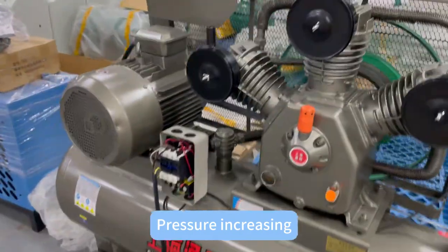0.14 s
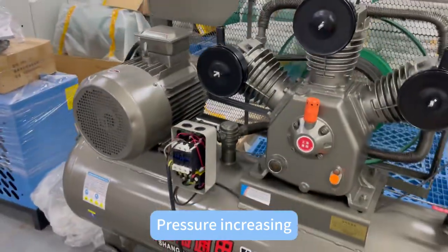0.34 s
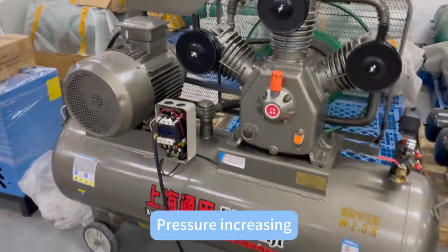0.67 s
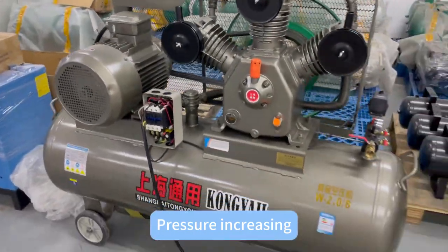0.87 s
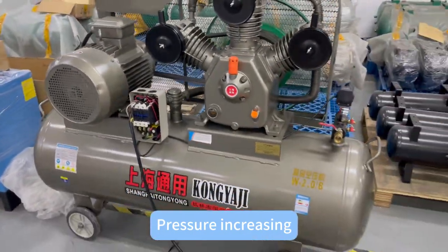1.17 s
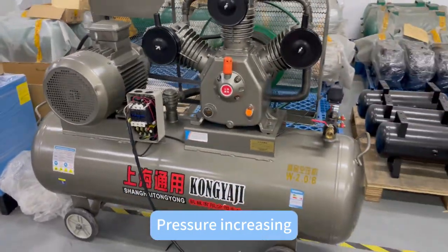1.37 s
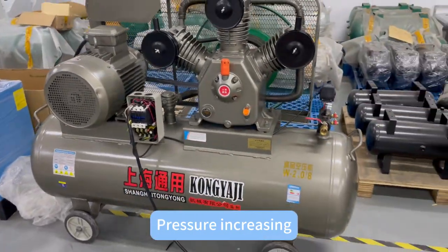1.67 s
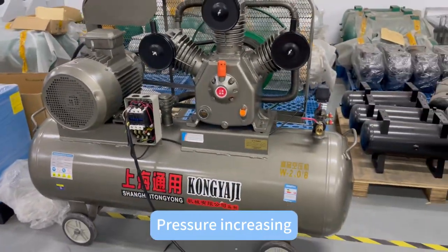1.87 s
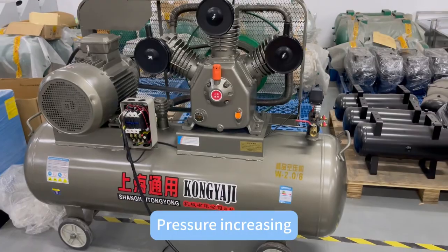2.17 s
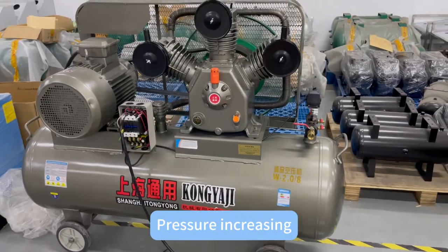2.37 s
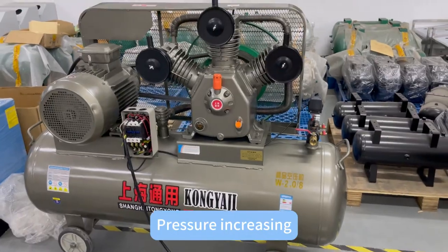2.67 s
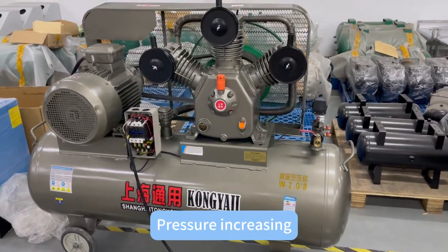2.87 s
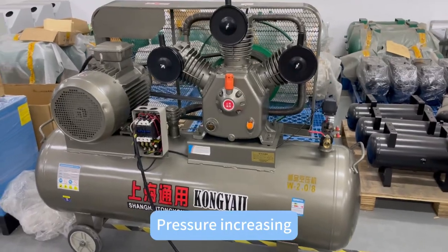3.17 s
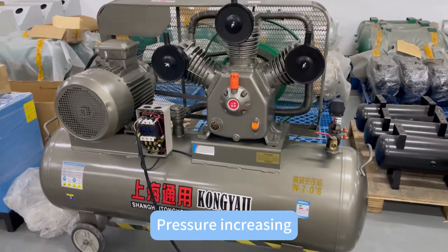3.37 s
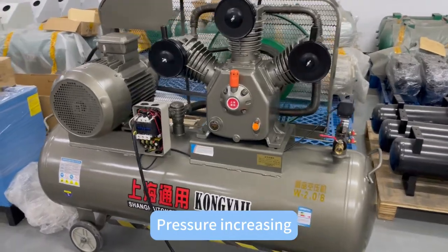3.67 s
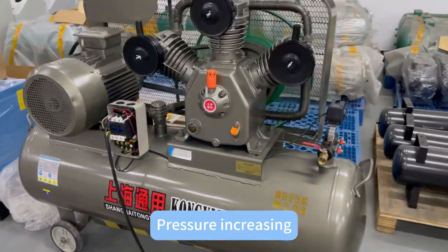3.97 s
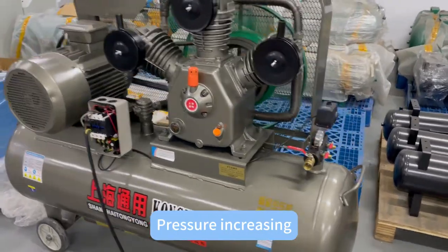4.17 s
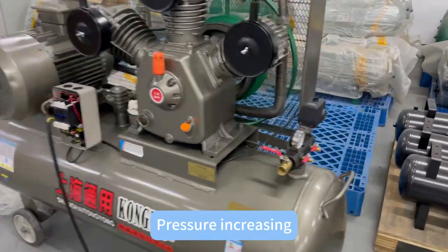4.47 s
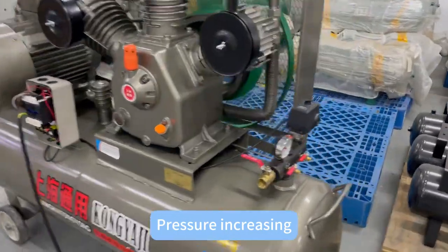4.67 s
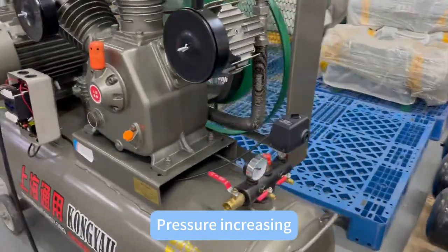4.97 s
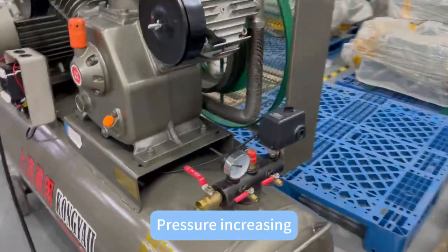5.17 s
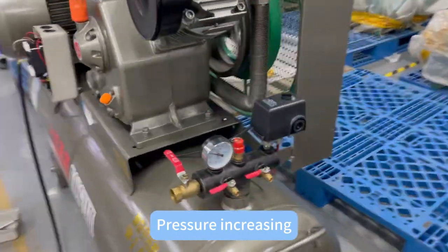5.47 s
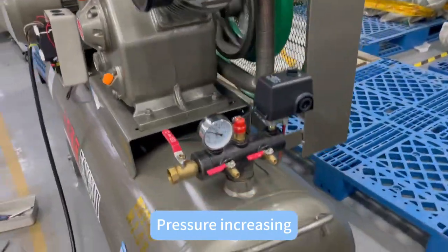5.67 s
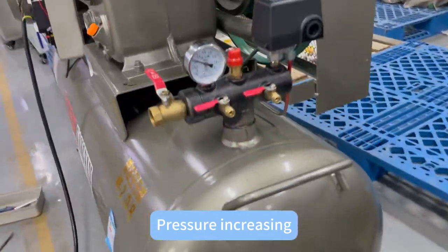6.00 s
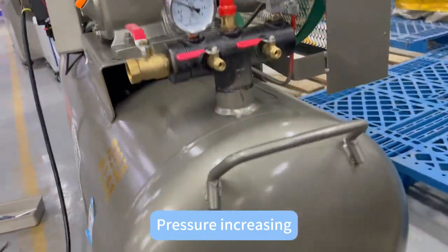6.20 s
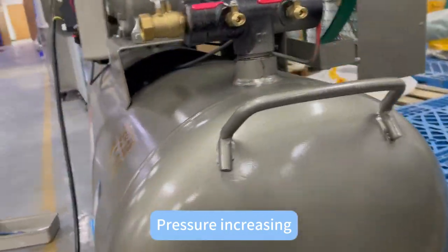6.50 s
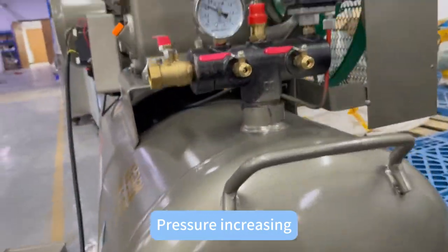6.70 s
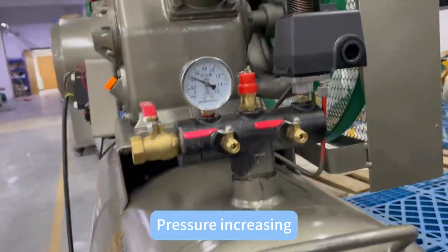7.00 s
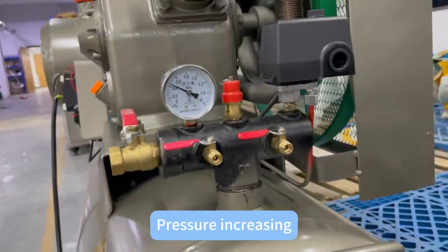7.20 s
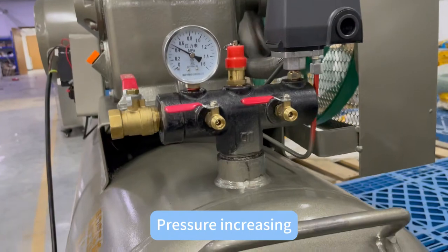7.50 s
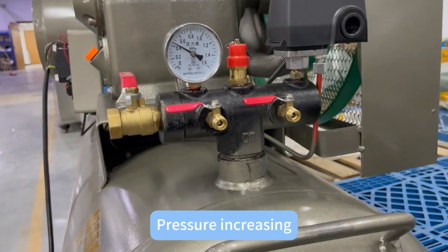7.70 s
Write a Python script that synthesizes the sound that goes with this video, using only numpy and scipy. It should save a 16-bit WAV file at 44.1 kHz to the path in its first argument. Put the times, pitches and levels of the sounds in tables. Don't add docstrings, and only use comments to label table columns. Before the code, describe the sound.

Rapid throbbing drone of a three-cylinder air compressor, airy and clattery, growing closer and hissier as a handheld microphone moves towards it.

```python
import sys
import numpy as np
from scipy import signal
from scipy.fft import rfft, irfft, next_fast_len
from scipy.io import wavfile
from scipy.ndimage import uniform_filter1d, map_coordinates

SR = 44100
rng = np.random.default_rng(int(sys.argv[2]) if len(sys.argv) > 2 else 0)


def pcm_store(signal):
    levels = np.round(np.clip(np.atleast_2d(signal), -1, 1) * 32767)
    wavfile.write(sys.argv[1], SR, levels.astype(np.int16).T)


def natural_amplitude(level_db):
    exponent = np.asarray(level_db, float) / 20
    return 10 ** exponent


N = 346185
CRANK_HZ = 12.847


def rms_one(x):
    return x / np.sqrt(np.mean(x ** 2) + 1e-20)


def in_time(rows, s):
    t, *columns = np.transpose(rows)
    return [np.interp(s, t, column) for column in columns]


def plateaus(rows, s, rest_db, edge_db_per_s):
    spans = []
    for start, end, db in rows:
        outside_s = np.maximum(0, np.maximum(start - s, s - end))
        spans.append(db - edge_db_per_s * outside_s)
    return np.maximum(rest_db, np.max(spans, axis=0))


def drift(rate, count):
    r = np.exp(-80 * np.pi * rate / SR)
    noise = rng.standard_normal((count, N // 40 + 2002))
    slow = signal.lfilter([1], [1, -2 * r, r * r], noise)[:, 2000:]
    return np.repeat(slow / slow.std(axis=1, keepdims=True), 40, axis=1)[:, :N]


def bandpass(order, low_hz, high_hz, x):
    return signal.sosfilt(signal.butter(order, [low_hz, high_hz], "band", fs=SR, output="sos"), x)


# multiple [of crank_hz], front_db, afar_db, tank_end_db, gauge_db
ORDERS = [(1, -42, -42, -42, -42), (2, -40, -42, -37, -36), (3, -22, -25, -16, -10),
          (4, -37, -42, -24, -22), (5, -18, -18, -17, -16), (6, -15, -9, -5, -2), (7, -34, -15, -6, -1),
          (8, -10, -11, -20, -27), (9, -7, -8, -4, -5), (10, -13, -12, -14, -11), (11, -5, 0, -1, 0),
          (12, 0, -6, 0, 0), (13, -11, -7, -5, 0), (14, -12, -9, -6, -3), (15, -6, -7, -7, -7),
          (16, -15, -16, -4, -4), (17, -10, -6, -32, -17), (18, -16, -12, -8, -8), (19, -13, -3, -23, -6),
          (20, -11, -9, -7, -7), (21, -7, -8, -1, -1), (22, -10, -10, -8, -5), (23, -25, -18, -8, -3),
          (24, -4, -4, -7, -2), (25, -16, -17, -13, -2), (26, -10, -7, -13, -9), (27, -8, -7, -11, -9),
          (28, -21, -24, -20, -9), (29, -13, -16, -6, -9), (30, -13, -13, -19, -13),
          (31, -22, -13, -18, -11), (32, -33, -18, -20, -14)]
UPPER_ORDERS = [(33, -17, -19, -21, -17), (34, -18, -18, -15, -14), (35, -26, -16, -11, -12),
                (36, -36, -14, -21, -13), (37, -35, -30, -32, -29), (38, -10, -24, -21, -14),
                (39, -27, -26, -29, -32), (40, -30, -24, -29, -30), (41, -26, -21, -24, -21),
                (42, -38, -23, -42, -30), (43, -42, -28, -26, -22), (44, -31, -27, -29, -42),
                (45, -36, -42, -32, -17), (46, -24, -35, -31, -19), (47, -36, -32, -29, -19),
                (48, -35, -34, -31, -23), (49, -41, -23, -25, -12), (50, -26, -24, -32, -22),
                (51, -21, -30, -27, -20), (52, -31, -28, -28, -18), (53, -22, -32, -21, -23),
                (54, -28, -28, -24, -25), (55, -32, -28, -42, -25), (56, -27, -42, -26, -19),
                (57, -25, -24, -24, -17), (58, -23, -32, -42, -17), (59, -42, -29, -42, -19),
                (60, -25, -23, -23, -26), (61, -30, -35, -26, -34), (62, -31, -35, -27, -42),
                (63, -27, -42, -24, -35), (64, -42, -31, -31, -18)]
UPPER_LIFT_DB = 0.5


def order_tables():
    k, *levels = np.transpose(ORDERS + UPPER_ORDERS)
    return [np.c_[k, level + UPPER_LIFT_DB * (k > len(ORDERS))] for level in levels]


def turn_spectrum(orders, booms, lull, boom_width_hz=55):
    k, level_db = np.transpose(orders)
    height = natural_amplitude(level_db) / np.sqrt(np.sum(natural_amplitude(level_db) ** 2))
    timing = 0
    for angle, hz, db in booms:
        nearness = -.5 * ((k * CRANK_HZ - hz) / boom_width_hz) ** 2
        timing = timing + natural_amplitude(db) * np.exp(nearness - 2j * np.pi * (k * angle + hz / 400))
    lull_angle, depth = lull
    quiet = np.clip(1.5 * np.cos(np.pi * (np.arange(256) / 256 - lull_angle)) ** 8, 0, 1)
    breathing = 1 - depth * quiet
    for _ in range(5):
        cycle = irfft(np.r_[0, height * timing / abs(timing)], 256)
        cycle = np.clip(cycle, -1.7 * cycle.std(), 2.4 * cycle.std())
        timing = rfft(cycle * breathing)[1:len(k) + 1]
    return height * timing / abs(timing)


# crank_angle [turns], pitch_hz, level_db
FRONT_BOOMS = [(0.25, 860, -13), (0.27, 200, -7), (0.37, 530, -16), (0.41, 226, -3), (0.43, 357, -7),
               (0.5, 410, -13), (0.63, 165, 0), (0.65, 299, -4), (0.75, 231, -1), (0.77, 390, -6),
               (0.81, 130, -8), (0.92, 140, -2), (0.97, 309, -3)]
# crank_angle [turns], pitch_hz, level_db
FAR_BOOMS = [(0.14, 740, -11), (0.21, 240, -7), (0.35, 124, -10), (0.41, 458, -9), (0.49, 97, -2),
             (0.54, 160, -10), (0.61, 298, 1), (0.67, 530, -8), (0.7, 162, -3), (0.74, 450, -8),
             (0.93, 120, 2), (0.93, 231, -6), (0.99, 281, 2)]
# crank_angle [turns], pitch_hz, level_db
CLOSE_BOOMS = [(0.04, 310, -4), (0.11, 220, -7), (0.35, 270, -16), (0.4, 360, -14), (0.41, 140, -7),
               (0.43, 340, -16), (0.44, 720, 2), (0.46, 210, -6), (0.53, 670, -2), (0.59, 50, -11),
               (0.59, 290, -2), (0.75, 340, -8), (0.77, 140, 0), (0.82, 490, -16), (0.85, 120, -2),
               (0.89, 80, -5), (0.96, 260, -8)]
# crank_angle [turns], pitch_hz, level_db
GAUGE_BOOMS = [(0.02, 400, -16), (0.16, 220, -9), (0.31, 530, -16), (0.34, 710, 0), (0.43, 250, -2),
               (0.43, 330, -6), (0.56, 70, -15), (0.57, 660, 1), (0.58, 320, -1), (0.59, 80, 2),
               (0.67, 120, -12), (0.75, 300, -4), (0.78, 130, -2), (0.88, 330, -16), (0.91, 360, -16),
               (0.92, 380, -15), (0.96, 230, -4)]
LULL = [
    (.14, .1),
    (.8, .05),
    (.27, .15),
    (.27, .15),
]
# time_s, place [0 front, 1 afar, 2 tank end, 3 gauge], walking_blur [0-1]
PLACE = [(0, 0, .03), (.5, .05, .05), (.85, .5, .2), (1.2, .9, .1), (1.5, 1, 0), (3.5, 1, 0),
         (4.0, 1.1, .4), (4.35, 1.4, .55), (4.75, 1.9, .2), (5.2, 2, .03), (5.8, 2.1, 0), (6.4, 3, 0),
         (7.85, 3, 0)]
WALK_EVENS = 0.83


def thumps(turn):
    whole, size = turn.astype(int), 1024
    turn_s = np.arange(whole[-1] + 2) / CRANK_HZ
    place, blur = np.array(in_time(PLACE, turn_s))[:, :, None]
    orders = 0
    booms = (FRONT_BOOMS, FAR_BOOMS, CLOSE_BOOMS, GAUGE_BOOMS)
    for k, heard in enumerate(zip(order_tables(), booms, LULL)):
        share = np.sqrt(np.clip(1 - abs(place - k), 0, 1))
        orders = orders + share * turn_spectrum(*heard)
    chance = rng.standard_normal(orders.shape + (2,)) @ [1, 1j]
    slow_chance = signal.lfilter([.4], [1, -.85], chance, axis=0)
    wander = slow_chance * (.08 + blur) + .6 * blur * chance
    low = np.arange(1, orders.shape[1] + 1) <= len(ORDERS)
    evened = orders * (abs(orders) / 0.14) ** (-WALK_EVENS * blur * low)
    orders = evened * (1 + 1.08 * wander.real) * np.exp(1j * wander.imag)
    orders = orders / np.linalg.norm(orders, axis=1, keepdims=True)
    cycles = irfft(np.pad(orders, ((0, 0), (1, 0))), size, axis=1) * size / np.sqrt(2)
    part = turn - whole
    now = map_coordinates(cycles, [whole, part * size], order=1, mode="grid-wrap")
    then = map_coordinates(cycles, [whole + 1, part * size], order=1, mode="grid-wrap")
    return (1 - part) * now + part * then


def banded_noise(spectrum, beat, patchy_db, source):
    hz, level = np.transpose(spectrum)
    edges = np.geomspace(hz[0], hz[-1], int(2.5 * np.log2(hz[-1] / hz[0])) + 2)
    flicker, out = drift(35.0, count=len(edges)), 0
    for k, (low, high) in enumerate(zip(edges, edges[1:])):
        band = bandpass(2, low, high, source[k % 2])
        level_db = np.interp(np.log(low * high) / 2, np.log(hz), level) + patchy_db * flicker[k]
        out = out + natural_amplitude(level_db) * band * beat ** (0.31 + 0.23 * k / len(edges))
    return rms_one(out)


# pitch_hz, level_db [per Hz]
RUSH = [(40, -8), (70, -3), (300, -4), (460, -6), (600, -11.5), (800, -9.5), (1000, -10), (1350, -14),
        (2200, -16), (3000, -21), (4500, -30)]


def intake_rush(turn, close):
    intake = natural_amplitude((1.5 + 0.5 * close) * np.cos(2 * np.pi * (turn - .68)))
    return banded_noise(RUSH, intake, patchy_db=0.83, source=rng.standard_normal((2, 2, N)))


# crank_angle [turns], far_db, close_db
VALVES = [
    (.105, 3, -14),
    (.275, 5.5, 9),
    (.45, -1, -5),
    (.62, 0.5, -11),
]
VALVE_DECAY_S, VALVE_OVER_HISS_DB = 0.013, 4.5


def valve_beat(turn, close):
    beat = np.ones(N)
    for angle, far_db, close_db in VALVES:
        since = turn - angle + 1
        luck = rng.standard_normal((int(turn[-1]) + 3, 2))[since.astype(int)]
        age = np.maximum(since % 1 / CRANK_HZ - .002 - 0.00058 * luck[:, 0], 0)
        level_db = far_db + close * (close_db - far_db) + VALVE_OVER_HISS_DB + 1.5 * luck[:, 1]
        tick = np.exp(-age / VALVE_DECAY_S) + 0.89 * np.exp(-age / 0.0017)
        beat += natural_amplitude(level_db) * (age > 0) * tick
    return beat


# pitch_hz, level_db [per Hz]
HISS = [(2500, 1.5), (3700, -7.5), (4600, -1.5), (5700, -1.5), (7000, -2.5), (8200, 0.5), (9500, -6.5),
        (12000, -7.5), (14000, -11.5), (15000, -6), (16200, -3)]


def valve_hiss(turn, close):
    grains = rng.standard_normal((2, 2, N)) * natural_amplitude(0.49 * rng.exponential(1, (2, 1, N)))
    return banded_noise(HISS, valve_beat(turn, close), patchy_db=0.97, source=grains)


STREAK_DB, STREAK_HZ, STREAK_S = 2.1, 70, .06
STROKE_DB, STROKE_HZ = 1.6, 220


def streaks(x):
    _, s, spectra = signal.stft(x, SR, nperseg=1024)
    luck = rng.standard_normal(spectra.shape[1:])
    for axis, size in enumerate((STREAK_HZ * 1024 / SR, STREAK_S * SR / 512)):
        luck = uniform_filter1d(luck, size=round(size), axis=axis)
    struck = uniform_filter1d(rng.random(len(luck)), size=round(STROKE_HZ * 1024 / SR))[:, None] * 6
    stroke_db = STROKE_DB * np.sqrt(2) * np.cos(2 * np.pi * (s * CRANK_HZ - struck))
    gain = rms_one(natural_amplitude(STREAK_DB * rms_one(luck) + stroke_db))
    return signal.istft(spectra * gain)[1][:, :N]


# far_hz, close_hz, width_hz, steady_share [of spread], throb [0-1 per turn]
RINGS = [
    (843, 822.5, 18, 3.0, 0.7),
    (1078, 1078.5, 20, 2.5, 0),
    (1141, 1142.5, 4, 5, -1.5),
    (1520, 1510, 77, 0.5, -0.05),
]
# start_s, end_s, level_db
SWELLS = [
    [(.05, 0.37, -35), (.85, 4.1, -32.5), (4.6, 6.5, -37), (5.33, 5.33, -26), (5.5, 5.6, -27),
     (5.72, 5.9, -31), (5.88, 6, -26.5), (6.1, 6.3, -34), (6.3, 7.85, -41)],
    [(1.1, 1.13, -37), (1.29, 1.4, -33), (1.66, 1.7, -31), (1.97, 2.03, -31), (2.15, 2.17, -35),
     (2.37, 3.1, -36), (2.67, 2.6, -34), (2.91, 2.85, -28), (3.21, 4.2, -33.5), (3.61, 3.3, -31),
     (4.07, 4.3, -38)],
    [(1.1, 1.17, -31), (1.96, 1.98, -38), (3.22, 3.34, -31.5), (3.82, 3.9, -35), (6.3, 6.5, -34.5),
     (6.85, 6.97, -35)],
    [(0, .6, -41), (5.2, 6.6, -36.5), (6.8, 7.85, -30)],
]
RING_REST_DB, RING_EDGE_DB_PER_S = -47.5, 140


def rings(s, turn, close):
    out = np.zeros((2, N))
    for (far_hz, close_hz, width, steady, throb), swells in zip(RINGS, SWELLS):
        level_db = plateaus(swells, s, RING_REST_DB, RING_EDGE_DB_PER_S)
        slow = drift(width, count=4)
        phase = 2 * np.pi * np.cumsum(far_hz + close * (close_hz - far_hz)) / SR
        tone = (steady + slow[:2]) * np.cos(phase) + slow[2:] * np.sin(phase)
        throbbing = 1 + np.clip(throb, 0, 1) * np.cos(2 * np.pi * (turn - .85))
        out += natural_amplitude(level_db - 6.0) * rms_one(tone) * throbbing
    return out


def resonance(x, hz, width):
    r = np.exp(-np.pi * width / SR)
    poles = [1, -2 * r * np.cos(2 * np.pi * hz / SR), r * r]
    return signal.lfilter(np.array([1, 0, -1]) * (1 - r * r) / 2, poles, x)


# pitch_hz, width_hz, front_db, afar_db, tank_end_db
CLATTER = [(670, 72, -39, -44, -52), (737, 73, -43, -51, -40.5), (1286, 62, -37, -64, -50),
           (1590, 51, -45, -52, -37.5), (2126, 80, -61, -50, -35), (2274, 63, -53, -49, -46),
           (2660, 60, -46, -46, -38.5), (3220, 99, -54, -45, -71), (3683, 62, -52, -55, -43),
           (4090, 78, -48, -51, -40), (4570, 40, -60, -68, -60), (5200, 710, -45, -44.5, -39)]
CLATTER_DB, CLATTER_PATCHY_DB = -8, 2
KNOCK_TURNS, KNOCK_DB, KNOCK_FADE_TURNS = 0.46, 2.5, 0.33


def clatter(turn, place):
    knock_db = KNOCK_DB * (np.exp(-((turn - KNOCK_TURNS) % 1) / KNOCK_FADE_TURNS) - .3)
    shake = natural_amplitude(CLATTER_DB + knock_db) * rng.standard_normal((2, N))
    out = 0
    for (hz, width, *place_db), flare in zip(CLATTER, drift(3.5, count=len(CLATTER))):
        level_db = np.interp(place, range(3), place_db) + CLATTER_PATCHY_DB * flare
        out = out + natural_amplitude(level_db) * resonance(shake, hz, width) * np.sqrt(SR / np.pi / width)
    return out


# start_s, end_s, pitch_hz, level_db
SQUEAK = [
    (6.189, 6.38, 1323, -32.5),
]


def belt_squeak(s):
    out = np.zeros(N)
    for start, end, hz, level_db in SQUEAK:
        swell = np.sin(np.pi * np.clip((s - start) / (end - start), 0, 1))
        out += natural_amplitude(level_db) * swell * np.sin(2 * np.pi * hz * s)
    return out


# start_s, end_s, rumble_db
MOVES = [(.05, .3, -28), (.98, 1.04, -25), (1.38, 1.42, -28), (1.78, 1.84, -29), (2.6, 2.64, -23),
         (3.5, 3.68, -26), (3.95, 4.2, -25), (4.24, 4.3, -20), (4.4, 4.52, -27), (5.5, 5.7, -36),
         (6.54, 6.62, -22)]
HAND_STILL_DB, HAND_FOLLOWS, HAND_EDGE_DB_PER_S = -41, 1.8, 110


def hand_rumble(s, nearer_db):
    rumble_db = plateaus(MOVES, s, HAND_STILL_DB + HAND_FOLLOWS * nearer_db, HAND_EDGE_DB_PER_S)
    low = bandpass(3, 39, 85, rng.standard_normal((2, N)))
    return natural_amplitude(rumble_db - 5.0 + 2.5 * drift(1.7, count=1)) * rms_one(low)


# start_s, peak_db, pitch_hz
BUMPS = [
    (4.299, -13.5, 207),
    (2.9, -39, 190),
    (3.6, -22, 438),
    (5.7, -24, 210),
    (4, -27, 850),
    (3.815, -25, 160),
    (3.6, -24, 260),
    (4.306, -27, 750),
    (4.327, -19.5, 450),
]
BUMP_SAG_PER_S = 19.1


def hand_bumps(s):
    out = np.zeros(N)
    scuff = rms_one(bandpass(1, 80, 700, rng.standard_normal(N)))
    for at, level_db, hz in BUMPS:
        age = np.maximum(s - at, 0)
        swell = np.e * age / 0.0048 * np.exp(-age / 0.009)
        thud = np.sin(2 * np.pi * hz * age * np.exp(-BUMP_SAG_PER_S * age))
        out += natural_amplitude(level_db) * swell * (thud + 0.087 * scuff)
    return out


# time_s, level_db
NEARNESS = [(0, -40), (.45, -42), (1.2, -42.5), (2.6, -41.5), (3.5, -41), (4.3, -39.5), (5.25, -38),
            (6.4, -37.5), (7.85, -37.5)]
REFERENCE_DB = -43
THUMP_DB, THUMP_FOLLOWS, THUMP_BLUR_LOSS_DB = -19.5, 0.5, 2
RUSH_DB, RUSH_FOLLOWS = -33, 0.56
RUSH_OVER_DB, HISS_OVER_DB, THUMP_OVER_DB = 6.5, 3, 1.27


def scene():
    s = np.arange(N) / SR
    turn = s * CRANK_HZ
    place, blur = in_time(PLACE, s)
    close = np.minimum(abs(place - 1), 1)
    hiss_db, = in_time(NEARNESS, s)
    nearer_db = hiss_db - REFERENCE_DB
    thump_db = THUMP_DB + THUMP_FOLLOWS * nearer_db - THUMP_BLUR_LOSS_DB * blur
    rush_db = RUSH_DB + RUSH_FOLLOWS * nearer_db
    pulses = natural_amplitude(thump_db + THUMP_OVER_DB) * thumps(turn)
    rush = natural_amplitude(rush_db + RUSH_OVER_DB) * intake_rush(turn, close)
    hiss = natural_amplitude(hiss_db + HISS_OVER_DB) * valve_hiss(turn, close * np.clip(s - 2, .4, 1))
    mix = np.array([pulses, np.roll(pulses, 1300)]) + streaks(rush + hiss)
    mix += rings(s, turn, close * (s > 2)) + clatter(turn, place) + hand_rumble(s, nearer_db)
    mix[0] += belt_squeak(s) + hand_bumps(s)
    return mix


# row [0 sum, 1 difference], low_hz, high_hz, share [0-1 of frames], full_from_s
MUTED = [
    (0, 7600, 7950, .65, .01),
    (0, 7950, 8250, .985, .01),
    (0, 8250, 8900, .5, .01),
    (0, 13800, 14500, .3, 2),
    (0, 14500, 15300, .97, 1.5),
    (0, 15300, 16000, .6, 2),
    (1, 10400, 11100, .62, 1.5),
    (1, 11100, 12350, .98, 2.2),
]


def band_dropouts(left, right, size):
    hz, frames = np.arange(len(left)) * SR / size, np.arange(N // 1024 + 2)
    spectra = np.array([left + right, left - right]) / 2
    rows = irfft(spectra, size)[:, :N]
    for row, low, high, share, full_s in MUTED:
        luck = uniform_filter1d(rng.random(len(frames)), size=2) + .3 * rng.random(len(frames))
        setting_in = np.clip(.25 + .75 * frames * 1024 / SR / full_s, 0, 1)
        off = luck < np.quantile(luck, share) * setting_in
        ramp = np.clip(3 * np.interp(np.arange(N) / 1024 + .42, frames, off) - 1, 0, 1)
        fade = .5 - .5 * np.cos(np.pi * ramp)
        rows[row] -= fade * irfft(spectra[row] * (hz > low) * (hz <= high), size)[:N]
    return np.array([rows[0] + rows[1], rows[0] - rows[1]])


def top_cut(x):
    return signal.sosfilt(signal.butter(12, 15710, fs=SR, output="sos"), x)


# pitch_hz, likeness [0-1], right_lag [radians], left_over_right_db
PORTS = [(60, .975, 0, .2), (400, .94, .1, -.7), (800, .72, .6, 2.2), (1400, .55, .5, 2.4),
         (1900, .3, -.2, 2.0), (2300, .65, .2, 1.8), (2900, .6, .6, 1.8), (4100, .66, .1, 2.0),
         (5100, .45, .6, 1.8), (5600, .6, 0, 1.6), (7000, .7, -1.2, .8), (8150, .85, -3.14, 0),
         (11600, .7, -6.28, 0), (14900, .7, -9.42, 0), (16000, .3, -10.6, 0)]
# pitch_hz, width_hz, level_db
PORT_PEAKS = [
    (8250, 180, -0.5),
    (15100, 620, 11),
    (3760, 120, 3.5),
    (2190, 200, 1),
]


def record(dry):
    size = next_fast_len(N)
    hz = np.arange(size // 2 + 1) * SR / size
    colour_db = sum(db / (1 + ((hz - top_hz) / width) ** 2) for top_hz, width, db in PORT_PEAKS)
    shared, other = rfft(dry, size) * natural_amplitude(colour_db)
    alike, lag, tilt_db = in_time(PORTS, hz)
    alike = np.clip(alike, 0, 1)
    both = np.sqrt((1 + alike) / 2) * shared
    own = np.sqrt((1 - alike) / 2) * other
    left = (both + own) * natural_amplitude(tilt_db / 2) * np.exp(.5j * lag)
    right = (both - own) * natural_amplitude(-tilt_db / 2) * np.exp(-.5j * lag)
    return top_cut(band_dropouts(left, right, size))


dry = scene()
out = record(dry)
pcm_store(out)
```